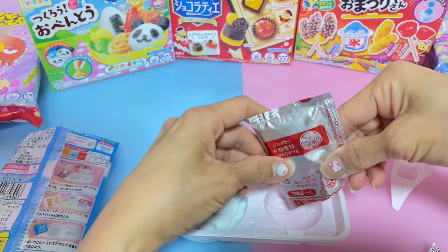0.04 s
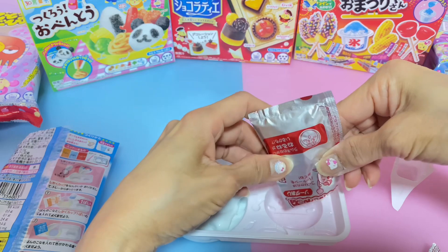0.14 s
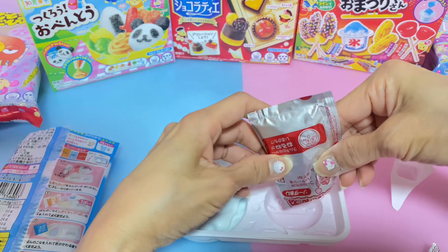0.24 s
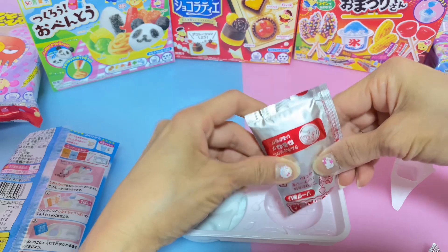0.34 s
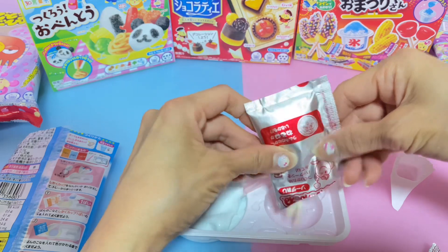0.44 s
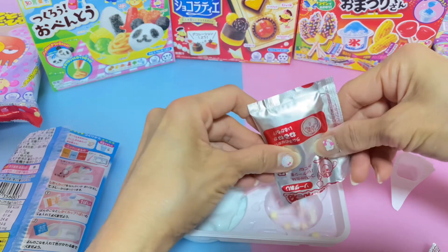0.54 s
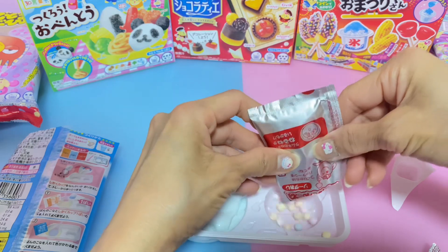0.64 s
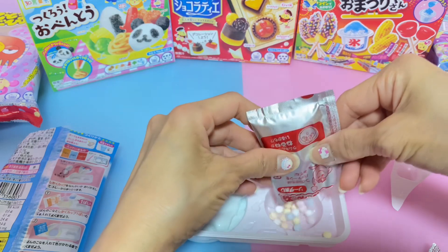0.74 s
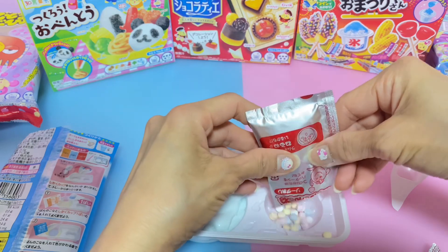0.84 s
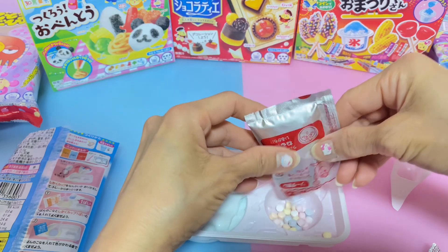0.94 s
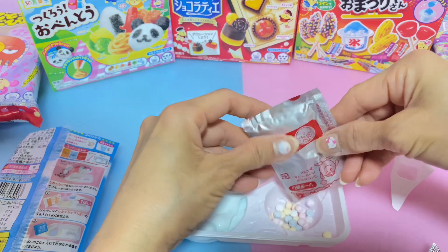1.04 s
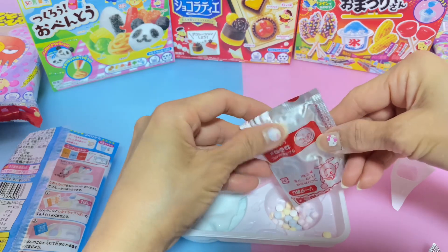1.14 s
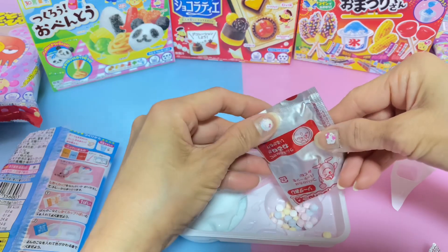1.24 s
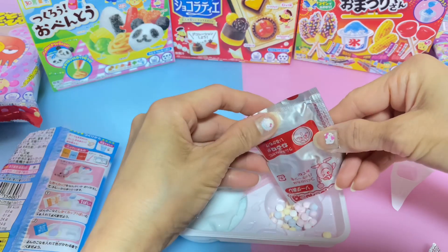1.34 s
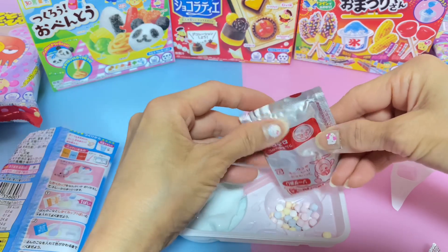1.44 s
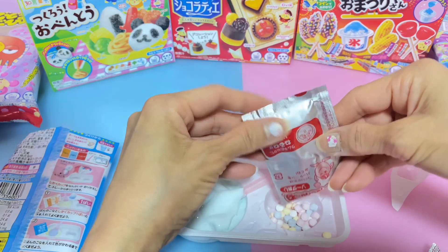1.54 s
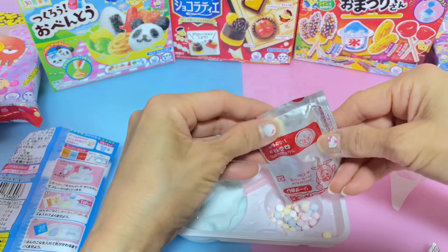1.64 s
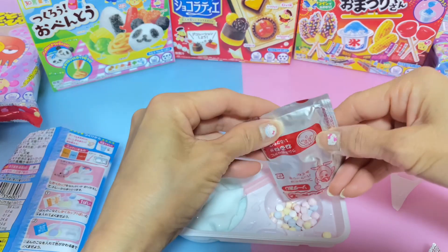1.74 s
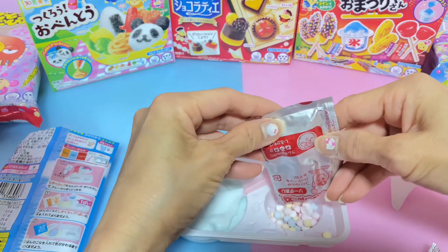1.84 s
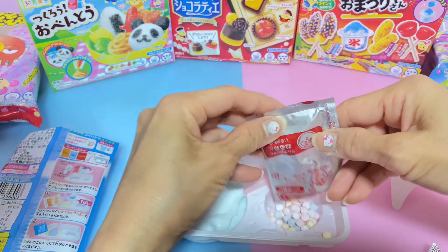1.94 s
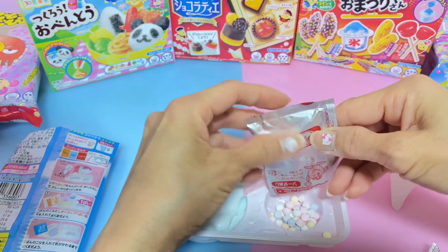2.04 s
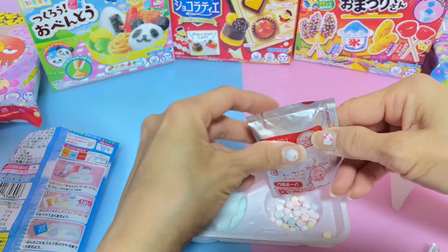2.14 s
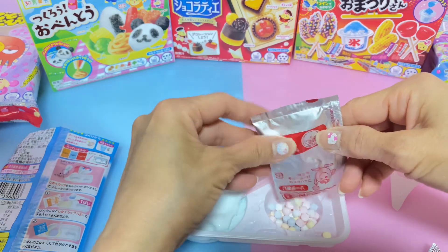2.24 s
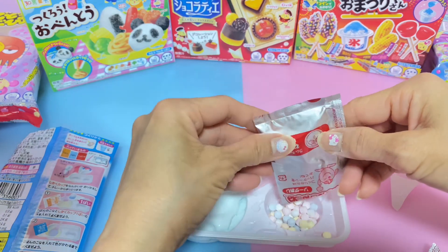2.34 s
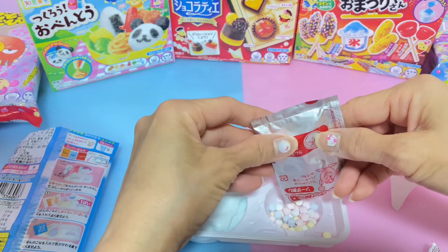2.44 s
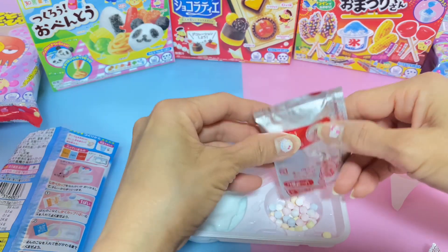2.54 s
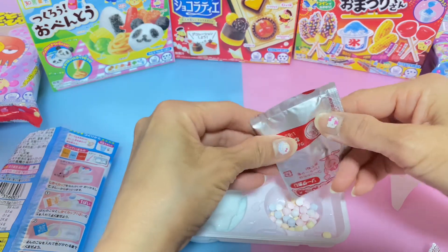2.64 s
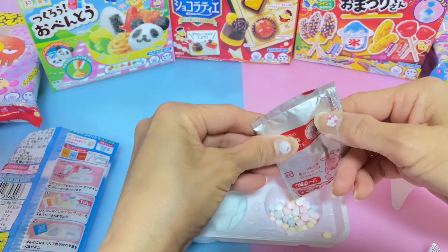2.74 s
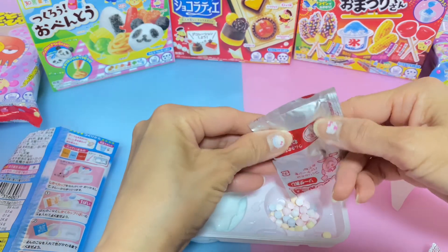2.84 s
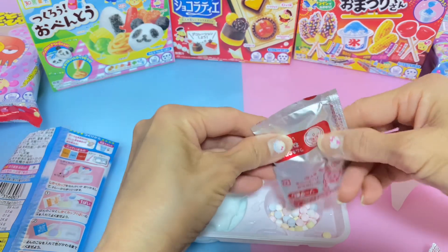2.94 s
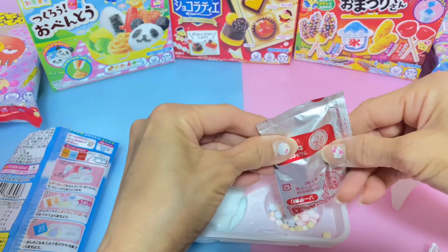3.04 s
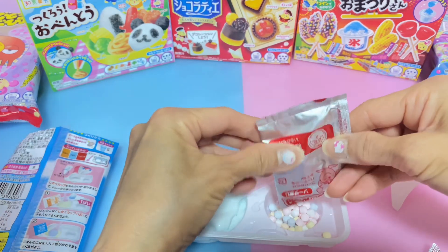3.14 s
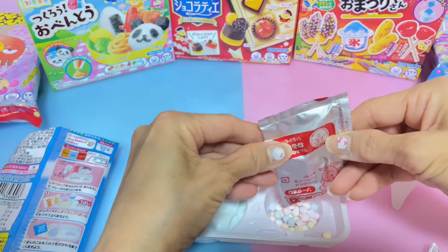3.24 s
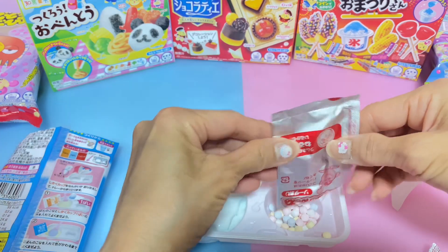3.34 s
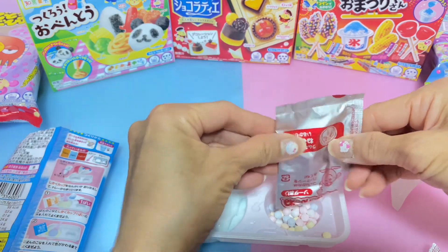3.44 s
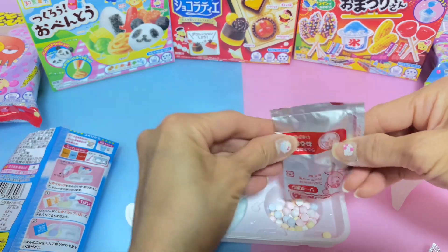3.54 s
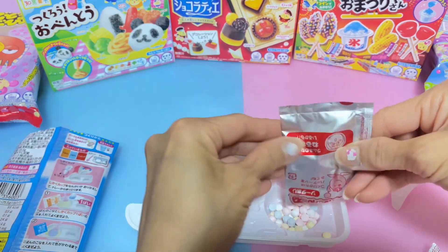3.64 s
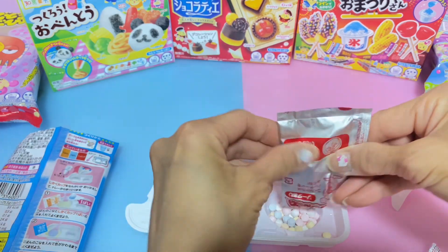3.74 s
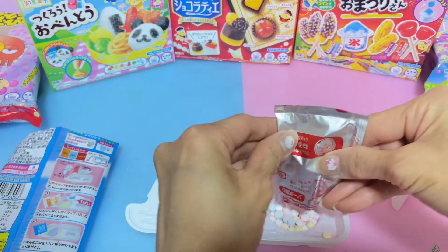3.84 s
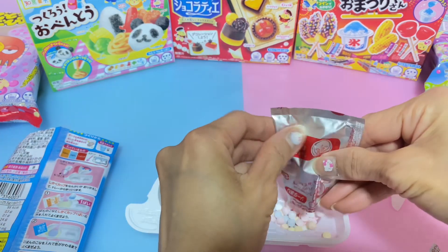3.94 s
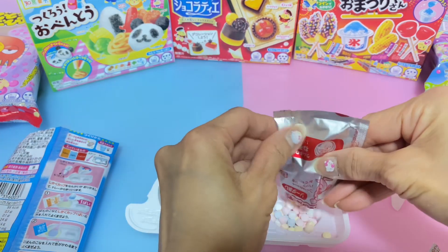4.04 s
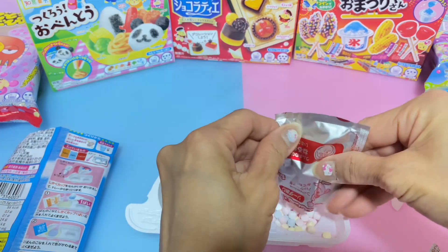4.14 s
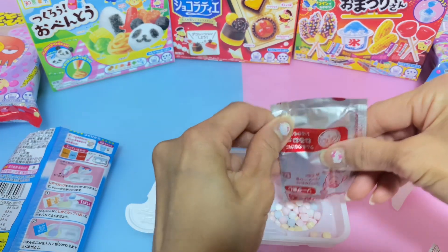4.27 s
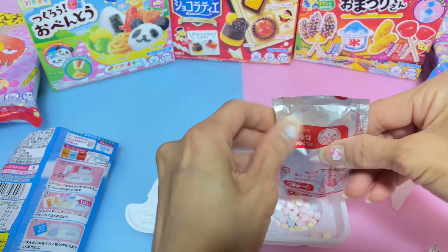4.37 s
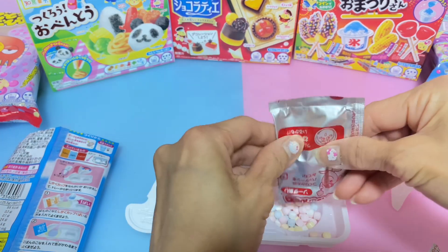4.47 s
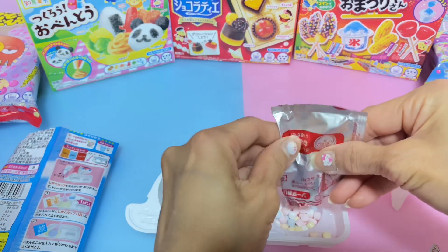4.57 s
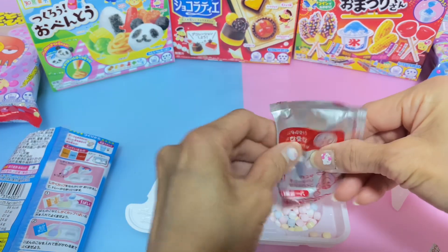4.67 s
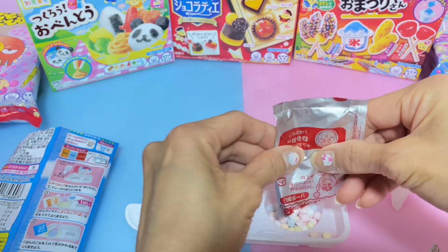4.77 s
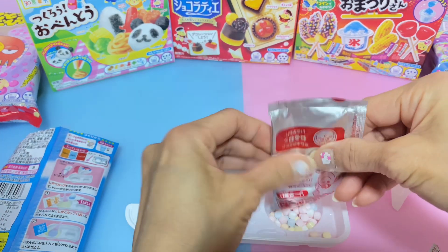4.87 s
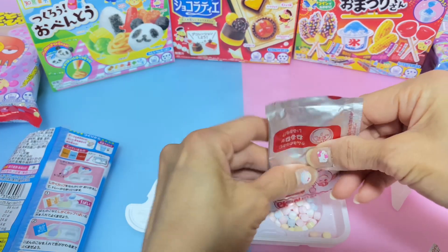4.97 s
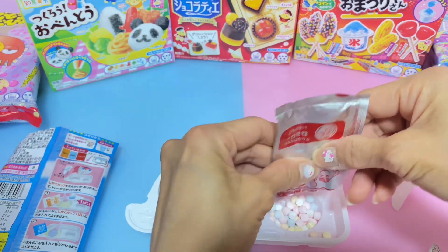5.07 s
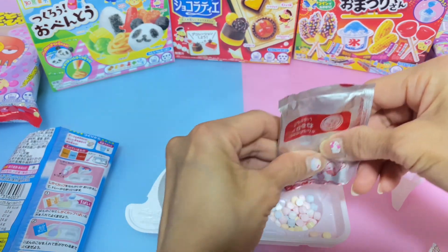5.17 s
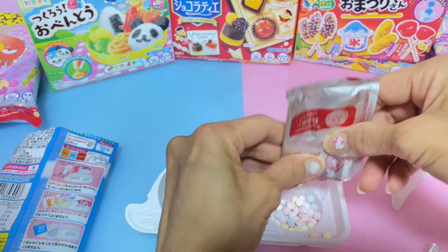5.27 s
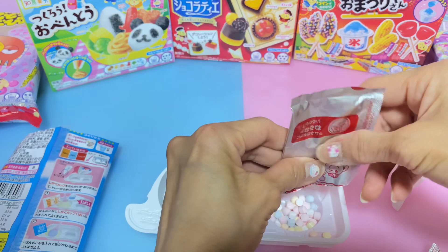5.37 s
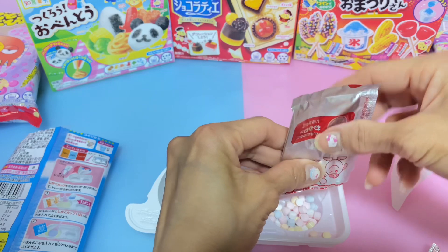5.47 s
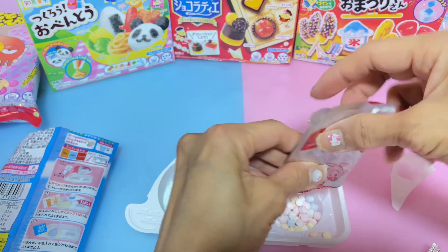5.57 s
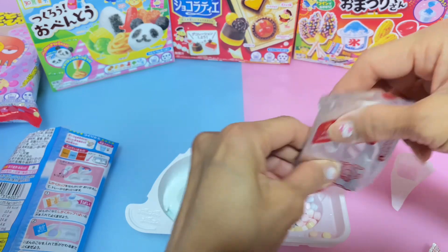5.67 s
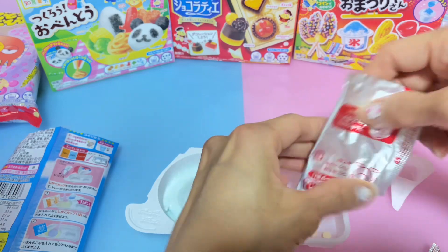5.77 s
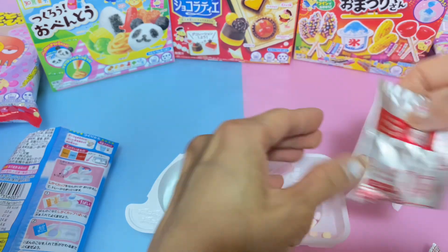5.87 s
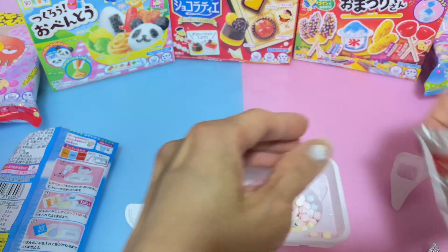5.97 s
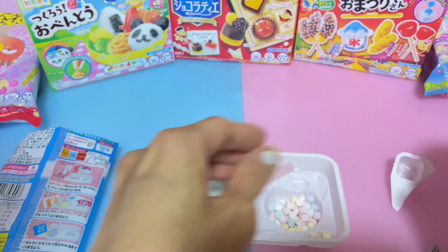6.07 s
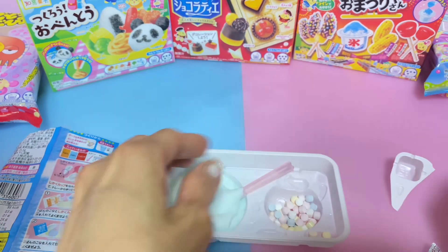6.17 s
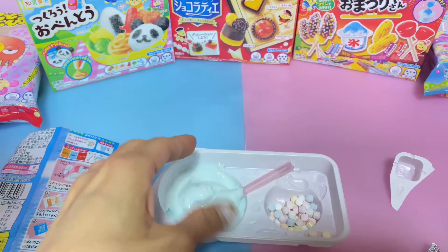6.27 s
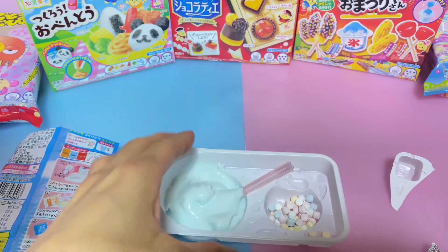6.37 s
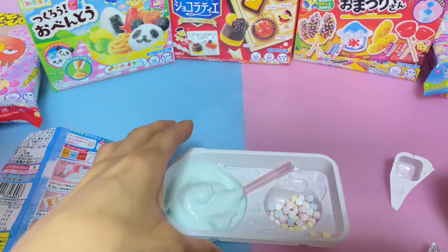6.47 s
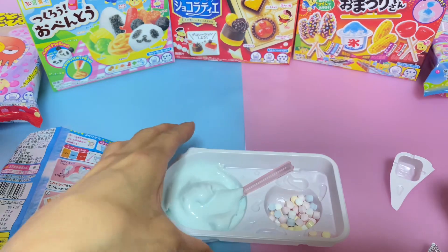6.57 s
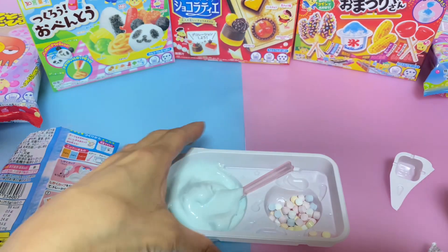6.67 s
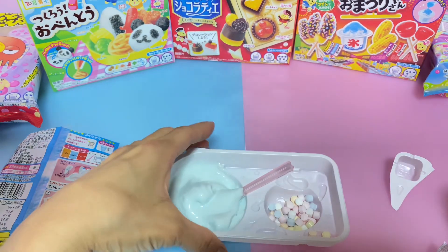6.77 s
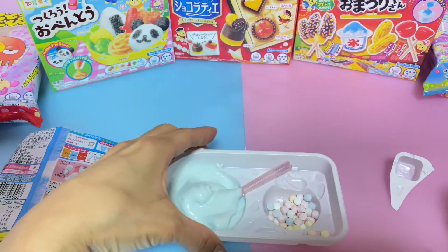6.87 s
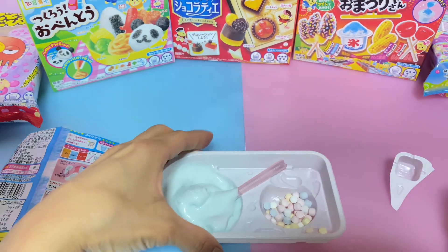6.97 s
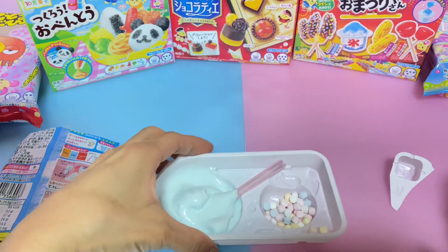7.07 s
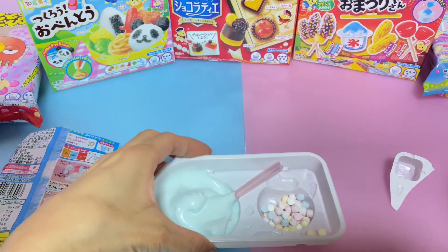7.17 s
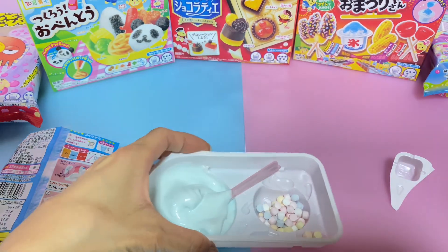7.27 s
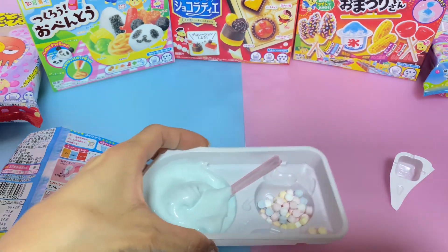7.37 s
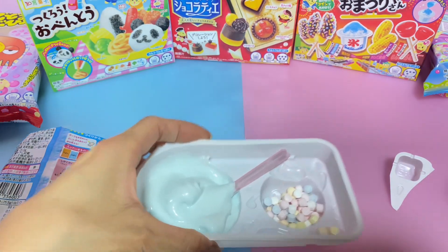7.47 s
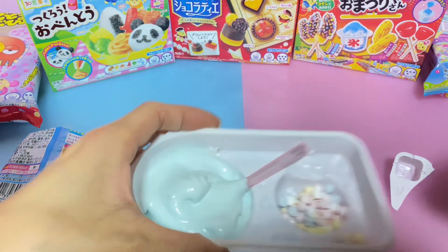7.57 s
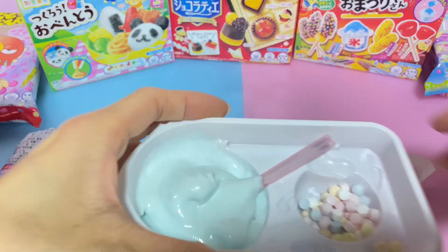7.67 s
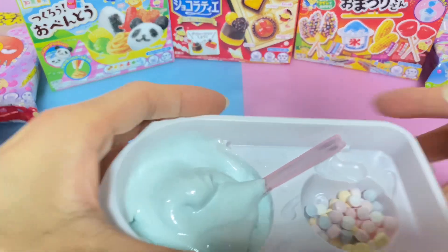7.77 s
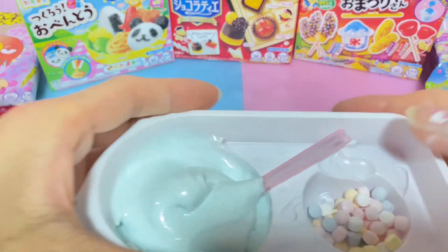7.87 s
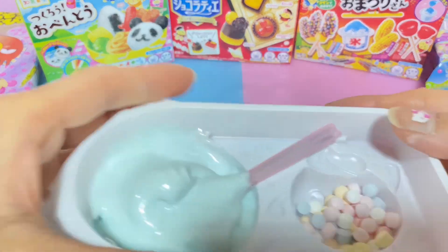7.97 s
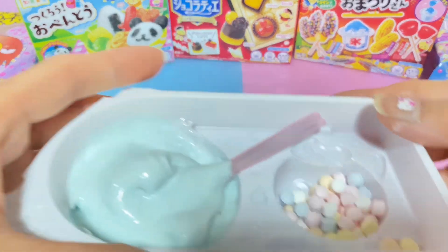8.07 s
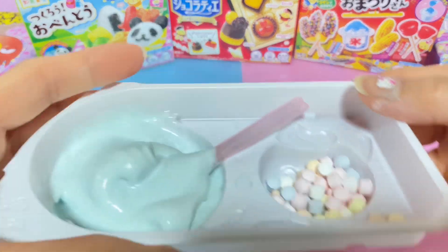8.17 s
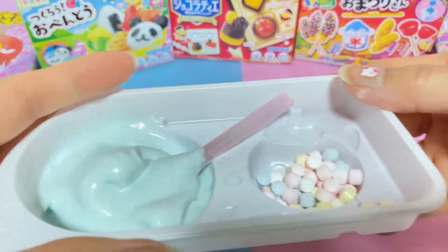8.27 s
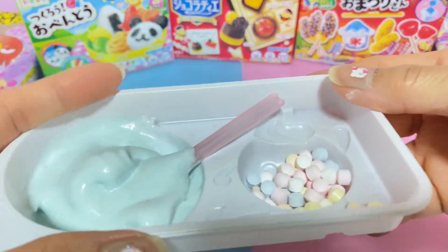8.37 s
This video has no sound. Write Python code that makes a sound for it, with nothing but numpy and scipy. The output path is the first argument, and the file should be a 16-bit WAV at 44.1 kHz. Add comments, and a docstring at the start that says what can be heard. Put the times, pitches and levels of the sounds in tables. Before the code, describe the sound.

A stiff foil packet is crinkled near a stereo microphone in a quiet indoor room. A loud cluster of snaps comes first, then steady crackling, then lighter irregular clicks with small renewed squeezes. The packet is put aside, and much softer skin scuffs, a barely audible squeak and little hollow ticks come from a thin plastic tray holding small sweets. Low room noise lies beneath.

```python
"""Foil sachet handled over a tray

Creases snap one by one as short noise bursts through resonant patches, over a rustle of dense random grains.
Later a hand slides on a plastic tray: rubbed noise, scuffs through wall resonances, ticks and a faint squeak.
The sachet wall groans as band-passed noise; low room noise swells and a diffuse tail follows the near sounds.
A two-port microphone hears all this with a likeness, lead and balance that depend on frequency."""
import sys
import numpy as np
from scipy import signal
from scipy.fft import rfft, irfft
from scipy.io import wavfile
from scipy.ndimage import uniform_filter1d

SR = 44100
rng = np.random.default_rng(int(sys.argv[2]) if len(sys.argv) > 2 else 0)


def master(y):
    """Save y as 16-bit WAV."""
    cut = np.clip(np.atleast_2d(y).T, -1, 1)
    pcm = np.round(cut * 32767)  # scale
    wavfile.write(sys.argv[1], SR, pcm.astype(np.int16))


N = 370881  # samples

# Spectrum of the low room noise: frequency_hz, relative_density_db
ROOM_SPECTRUM = [(15, -37.5), (25, -20), (64, -5), (92, -12), (123, -14.5), (180, -24), (384, -25.5),
                 (591, -36.5), (818, -32.5), (3080, -59), (16000, -64)]
# Decay of the diffuse tail: frequency_hz, t60_s
TAIL_DECAY = [(300, 0.23), (2000, 0.14), (14000, 0.042)]
# Phase by which the left port leads: frequency_hz, lead_rad
PORT_LEAD = [(0, -0.35), (7000, 0.5), (9000, -3.5), (11200, -6), (13400, -10), (16000, -11.5)]
# Likeness of the two ports: frequency_hz, likeness_0_to_1 (limited to MOST_ALIKE)
PORT_LIKENESS = [(60, 0.94), (300, 0.85), (1200, 0.5), (3000, 0.68), (5000, 0.62), (5900, 0.5), (7000, .9),
                 (15000, .88)]
# Balance, left over right: frequency_hz, balance_db
PORT_BALANCE = [(60, 1.5), (300, 3.5), (6000, 2.5), (8000, 0.2), (15000, 0)]
# Faint rubbing while the hand stays on the tray, one list per contact: time_s, level_db
RUB_LEVELS = [
    [(5.97, -53.5), (6.1, -65.5), (6.4, -59), (6.47, -70)],
    [(6.66, -73), (6.81, -63.5), (7.07, -58), (7.14, -66), (7.27, -57), (7.33, -77)],
    [(7.345, -55.5), (7.45, -68.5), (7.6, -74), (7.64, -60.5), (7.76, -84)],
    [(7.872, -53), (8.03, -58), (8.29, -54.5), (8.41, -64.5)],
]
# Spectrum of skin on plastic: frequency_hz, relative_density_db
SKIN_SPECTRUM = [(200, -24.5), (400, -9.5), (730, -0.5), (1250, -6.5), (2000, -4), (8000, -7),
                 (12000, -7.5), (15800, -9.5), (16200, -45)]
# Scuffs of skin along the tray: start_s, rise_s, fall_s, level_db, wall_pitch_hz
SCUFF_EVENTS = [(6.02, 0.031, 0.034, -53.5, 5500), (6.26, 0.0069, 0.019, -57, 900),
                (6.311, .02, 0.035, -55, 4300), (6.375, 0.026, 0.02, -55.5, 2800),
                (6.662, 0.012, 0.2, -48.5, 2600), (6.833, 0.014, 0.03, -45.5, 2720),
                (6.946, .005, .09, -55, 2500), (6.96, .055, .025, -56, 4300),
                (6.99, 0.032, 0.016, -54, 1500), (7.49, 0.024, 0.025, -58, 1194),
                (7.526, 0.034, 0.021, -58, 1200), (7.622, 0.012, 0.15, -52, 1150),
                (7.873, .006, .04, -58, 2100), (8.02, 0.076, 0.22, -56.5, 766),
                (7.96, 0.035, 0.078, -55, 1850), (8.058, 0.023, 0.028, -48, 3000),
                (8.18, 0.034, 0.038, -50.5, 2020)]
# Path of a slipping fingertip: time_s, level_db, pitch_hz
SQUEAK_PATH = [(5.951, -77, 2230), (6.03, -69, 2310), (6.17, -72, 2550)]
# Bends of the sachet wall: peak_s, level_db, rise_20db_s, fall_20db_s, pitch_hz
WALL_FLEXES = [(.4, -45, .04, .1, 290), (.5, -44, .12, .25, 370), (.8, -46, .2, .12, 850),
               (1.09, -46, .15, .12, 900), (1.48, -50, .05, .15, 480), (1.85, -46, .25, .15, 950),
               (2.01, -49, .03, .06, 400), (2.1, -49, .15, .12, 800), (3.8, -49, .04, .1, 380)]
# Squeezes of the sachet: firmest_grip_s, rustle_level_db, rise_20db_s, fall_20db_s
GRIP_SQUEEZES = [(0.0, -35, .05, .08), (.12, -62, .1, .05), (.38, -34, .11, .45), (.49, -24.5, .07, .44),
                 (.82, -34.5, .5, .085), (1.17, -33.5, .24, .14), (1.48, -45, .4, .5),
                 (1.69, -35.5, .1, .2), (1.849, -34, .2, .15), (2.14, -42, .6, .06), (2.25, -38, .07, .08),
                 (2.429, -49, .12, .035), (2.619, -50, .1, .12), (2.78, -62, .3, .3), (2.91, -49, .05, .25),
                 (3.3, -55, .06, .3), (3.5, -47, .12, .09), (3.69, -54, .07, .3), (3.918, -30, .2, .09),
                 (4.05, -46.5, .15, .14), (4.18, -56.5, .2, .4), (4.47, -51, .16, .25),
                 (4.85, -51, .11, .04), (4.98, -43.5, .06, .17), (5.3, -53, .3, .1), (5.45, -52, .06, .3),
                 (5.63, -49, .1, .045), (5.75, -60, .4, .4), (5.97, -47, .2, .06)]
# Broad spectrum of the foil: frequency_hz, relative_density_db
FOIL_SPECTRUM = [(150, -22), (330, -11.5), (1000, -7.5), (1700, -5.5), (2300, -3.5), (3400, -2),
                 (4500, -4.5), (6000, -6.5), (8000, -5), (11000, -7), (15500, -9.5), (16100, -33),
                 (17000, -45.5)]
# Sachet, tray and table ringing along: frequency_hz, width_hz, peak_db
HOLLOW_MODES = [(500, 200, -12.5), (727, 270, -10), (1340, 270, -2.5), (1880, 44, 1), (2200, 160, -4.5),
                (3458, 100, -12.5)]
# Ticks of the tray and the sweets in it: start_s, level_db, pitch_hz, thud_re_level_db, fizz_re_level_db, t60_s
TRAY_TICKS = [(6.19, -46.5, 3500, -16, -11, .0072), (6.209, -41, 4230, -11.5, -6, .011),
              (6.717, -43, 2770, -19, -22.5, .012), (6.761, -44, 4640, -10, -16, .022),
              (7.056, -45, 4800, -18, -10, .015), (7.341, -42.5, 5400, -8, -14, .0075),
              (7.359, -43, 6600, -13, -3, .032), (7.621, -42, 1204, -5, -12, .053),
              (7.877, -43.5, 3900, -23, -18, .03)]
# Creases of the foil snapping: start_s, level_db, patch_pitch_hz, thud_re_level_db, fizz_re_level_db
CREASE_SNAPS = [(.0446, -30, 3200, -35, -19), (.0764, -27, 2100, -19, -5), (.231, -34.5, 2050, -31, -12),
                (.2583, -30, 3120, -33, -14), (.3083, -39, 1260, -19, -16), (.3822, -21.5, 3040, -11, -11),
                (.3981, -35.5, 2200, -3, -13), (.4496, -19, 2800, -17, -26), (.4568, -16.5, 2870, -17, -6),
                (.4903, -19, 3320, -23, -3), (.522, -22, 1974, -17, -9), (.56, -13.5, 3170, -27, -10),
                (.578, -27, 2300, -15, -10), (.5965, -23, 2660, -13, -8), (.6131, -22.5, 3580, -25, -7),
                (.632, -30, 2010, -15, -9), (.6999, -26, 3500, -15, -4), (.7256, -19, 3300, -27, -10),
                (.752, -23.5, 3460, -19, -17), (.852, -29.5, 2700, -12, -16), (.9407, -26, 2960, -11, -7),
                (.9997, -21, 2350, -11, -11), (1.0124, -28, 1500, -9, -17), (1.1121, -29, 5330, -9, -12),
                (1.1308, -28.5, 2070, -20, -14), (1.1689, -22, 2230, -24, -12),
                (1.2008, -35, 2210, -14, -12), (1.2786, -34.5, 3260, -12, -8),
                (1.3155, -33, 2300, -14, -12), (1.3202, -24.5, 2320, -17, -17),
                (1.3802, -29.5, 3370, -14, -10), (1.4152, -33, 2250, -18, -21), (1.5251, -41, 1530, 4, -25),
                (1.5915, -35.5, 1300, -10, -15), (1.5986, -24, 2250, -10, -12),
                (1.6085, -29, 1180, -8, -27), (1.6572, -33, 2210, -14, -12), (1.694, -33, 2880, -14, -12),
                (1.7037, -24.5, 2290, -26, -14), (1.7732, -22, 2200, -12, -7),
                (1.8059, -30, 3460, -14, -12), (1.8368, -29, 2170, -14, -12),
                (1.8592, -28.5, 2200, -18, -28), (1.89, -30.5, 5400, -13, -13),
                (1.9671, -24.5, 3440, -16, -9), (2.0288, -30.5, 2180, -8, -8),
                (2.1493, -29.5, 2300, -7, -11), (2.1958, -32, 2100, -17, -5), (2.2223, -26, 2820, -19, -10),
                (2.2564, -34, 2540, -14, -12), (2.266, -31.5, 1500, -12, -18),
                (2.3012, -37, 1860, -10, -15), (2.358, -40, 1420, -4, -11), (2.4304, -44, 2100, -6, -20),
                (2.5312, -41, 3600, -14, -12), (2.5583, -42, 2800, 3, -30), (2.6211, -38, 2200, -14, -30),
                (2.628, -39, 2800, -12, -25), (2.7989, -27, 2370, -36, -38), (2.8204, -34.5, 2020, -5, -19),
                (2.8712, -34, 2060, -13, -22), (2.893, -28.5, 2100, -31, -13),
                (2.913, -38.5, 2010, -14, -20), (2.9343, -36, 2050, -10, -14),
                (3.0306, -39.5, 2030, -6, -9), (3.0498, -33.5, 2280, -37, -7),
                (3.1058, -41.5, 1230, -3, -12), (3.1599, -36, 3470, -10, -8),
                (3.2264, -39.5, 2780, -16, -8), (3.2702, -39.5, 1350, -12, -4),
                (3.2814, -39.5, 3660, -10, -11), (3.3332, -36, 3400, -17, -13),
                (3.4546, -38, 3420, -12, -14), (3.4922, -29.5, 2270, -12, -7), (3.5027, -27, 3750, -12, -8),
                (3.6652, -44.5, 2270, -8, -40), (3.69, -35, 3740, -6, -24), (3.7245, -36, 3660, -12, -14),
                (3.7444, -34, 1210, -2, -18), (3.7924, -36, 2080, -5, -14), (3.812, -36.5, 2130, -2, -1),
                (3.824, -35, 4000, -15, -3), (3.8364, -29, 2330, -9, -2), (3.8761, -28, 3960, -24, -15),
                (3.896, -31, 2300, -15, -12), (3.909, -30, 3300, -18, -12), (3.9202, -23, 2380, -41, -33),
                (3.9422, -32.5, 3980, -41, -36), (3.972, -37, 1850, -15, -14),
                (4.0338, -29.5, 1960, -18, -16), (4.198, -32, 3500, -19, -20),
                (4.2015, -21, 3800, -19, -20), (4.2399, -36, 3320, -20, -13), (4.3122, -42, 3500, -12, -10),
                (4.3429, -33, 3670, -21, -14), (4.3988, -37, 2840, -23, -17),
                (4.4096, -42.5, 4630, -5, -16), (4.4505, -33, 3520, -18, -25), (4.464, -40, 4300, -25, -14),
                (4.4693, -39, 3670, -21, 1), (4.4859, -37.5, 3620, -10, -16), (4.525, -34, 2430, 0, -14),
                (4.564, -44, 1350, -13, -16), (4.6131, -43, 7490, -31, -2), (4.6638, -27, 3700, -15, -9),
                (4.6765, -41, 1250, 3, -20), (4.6812, -29.5, 4340, -8, -7), (4.7101, -43, 1340, 0, -15),
                (4.7244, -43.5, 4870, -12, -16), (4.7701, -46, 1940, -4, -25), (4.8295, -47, 2000, -5, -20),
                (4.8542, -36.5, 2000, -9, -12), (4.9485, -47, 1920, -10, -10), (4.9645, -31, 2000, -12, -7),
                (4.9713, -22, 5900, -14, -14), (5.0064, -31, 5430, -21, -9), (5.05, -39, 2100, -20, -12),
                (5.0596, -33.5, 2070, -27, -12), (5.0748, -31, 3000, -8, 4), (5.157, -42.5, 4200, -26, -19),
                (5.192, -29, 7100, -13, -1), (5.1998, -38, 1340, -4, -8), (5.216, -43, 1900, -8, -14),
                (5.2549, -32, 2200, -11, -9), (5.2818, -29, 1980, -21, -6), (5.487, -43, 2500, -12, -8),
                (5.5075, -38, 1960, -8, -1), (5.6171, -35.5, 2840, -8, -3), (5.697, -32.5, 1900, -21, -7),
                (5.7434, -37.5, 1380, -14, -11), (5.8331, -32.5, 4930, -14, -27),
                (5.897, -43, 3530, -17, -22), (5.929, -41, 2400, -15, -10), (5.9347, -36, 2000, -18, -8)]

EDGE_HZ, MOST_ALIKE = 17000, .96
RUMBLE_DB, SWELL_RISE_S = -61.5, .15  # the rise covers 20 dB
SWELLS = [(2.64, -49, 1.0), (3.42, -49, .8)]  # peak_s, level_db, fall_20db_s
STIR_DB, STIR_T60_S = -24, .13  # each snap leaves the foil crackling: dB re its level, dying away
THUD_HZ, MIDDLE_HZ, FIZZ_HZ = (300, 1200), (1200, 8000), (9500, 12500)
SNAP_T60_S, TIGHT_DB, LONGER_PER_DB = .03, -35, .04  # a snap rings longer in a firmer grip
THUD_LAG_S = .0024  # the bass of a snap follows its crack
SNAP_SAMPLES, LEAD_IN_S = 2560, .012  # length of one burst, and the part before its crack


def amp(db):
    """Decibel law: level in dB to amplitude ratio."""
    return 10 ** (np.asarray(db) / 20)


def evened(x):
    """Normalization: each row is brought to unit rms."""
    return x / np.sqrt(np.mean(x ** 2, -1, keepdims=True) + 1e-20)


def read(points, hz):
    """Interpolation of a curve along log frequency."""
    f, value = np.transpose(points)
    return np.interp(np.log(hz + 1), np.log(f + 1), value)


def shaped(x, gain):
    """Linear filtering: the spectrum of each row is multiplied by gain(hz)."""
    length = x.shape[-1]
    return irfft(rfft(x) * gain(np.fft.rfftfreq(length, 1 / SR)), length)


def tents(t, peak_s, db, rise, fall):
    """Power summation, in dB, of bumps that climb and decay exponentially."""
    late = np.asarray(t)[..., None] - peak_s
    bumps = amp(db - 20 * np.maximum(late / fall, -late / rise))
    return 10 * np.log10((bumps ** 2).sum(-1) + 1e-14)


def ports(pair):
    """Interaural-style coherence: two noise versions are mixed by likeness, shifted in phase and balanced."""
    hz = np.fft.rfftfreq(pair.shape[-1], 1 / SR)
    same = np.clip(read(PORT_LIKENESS, hz), 0, MOST_ALIKE)
    a, b = rfft(pair)
    mixed = same * a + np.sqrt(1 - same ** 2) * b
    right = mixed * np.exp(-1j * np.interp(hz, *np.transpose(PORT_LEAD)))
    side = amp(read(PORT_BALANCE, hz) / 2)
    return irfft(np.array([a * side, right / side]), pair.shape[-1])


def hollow(hz):
    """Sympathetic resonance: peaks of the sachet, tray and table ringing along."""
    return 1 + sum(amp(db) / (1 + 2j * (hz - f) / w) for f, w, db in HOLLOW_MODES)


def body(hz):
    """Source and resonator: the foil's broad colour times the peaks of what rings along."""
    return amp(read(FOIL_SPECTRUM, hz)) * hollow(hz)


def tilt(hz, thud, fizz, knee_hz):
    """Spectral balance: scales the bass and slopes the treble from the knee upward."""
    low = 1 / (1 + (hz / 1150) ** 6)
    slope = np.log((hz + 1) / knee_hz) / np.log(9500 / knee_hz)
    return (low * thud + 1 - low) * fizz ** np.clip(slope, 0, 1)


def rumble():
    """Stationary room noise: coloured noise whose part below about 170 Hz swells a little."""
    noise = evened(shaped(rng.standard_normal((2, N)), lambda hz: amp(read(ROOM_SPECTRUM, hz))))
    low = shaped(noise, lambda hz: 1 / (1 + (hz / 170) ** 4))
    peak_s, db, fall = np.transpose(SWELLS)
    swells = amp(tents(np.arange(N) / SR, peak_s, db, SWELL_RISE_S, fall))
    level = np.hypot(amp(RUMBLE_DB), swells)
    return ports(low * level + (noise - low) * amp(-52.5))


def room(x):
    """Diffuse reverberation: convolution with noise whose bands each die at their own speed."""
    hz, t, z = signal.stft(rng.standard_normal((2, SR // 4)), SR, nperseg=128)
    decay = amp(-60 * t / read(TAIL_DECAY, hz)[:, None])
    tail = signal.istft(z * decay, SR, nperseg=128)[1]
    tail[:, :130] = 0  # the first reflection needs 3 ms
    tail = ports(tail)
    feed = x.mean(0)[None] + x[:1]
    return signal.fftconvolve(feed, tail / np.linalg.norm(tail[0]) / 2, axes=1)[:, :N]


def strokes(sing_db=19, width=0.1, rough=0.3):
    """Frictional excitation: skin stutters along plastic as rough hiss; in each scuff one tray wall sings."""
    t = np.arange(N) / SR
    a, b, slips = rng.standard_normal((3, N))
    stutter = np.exp(rough * evened(uniform_filter1d(slips, 50)))
    rub = np.array([a, b]) * stutter
    rub = evened(shaped(rub, lambda hz: amp(read(SKIN_SPECTRUM, hz)) * hollow(hz) ** .4))
    out = rub * sum(amp(np.interp(t, *np.transpose(rows), left=-140, right=-140)) for rows in RUB_LEVELS)
    for s, rise, fall, db, pitch in SCUFF_EVENTS:
        at = slice(round(s * SR), round((s + rise + 2 * fall) * SR))
        wall = shaped(rub[:, at], lambda hz: 1 + amp(sing_db) / (1 + 2j * (hz - pitch) / (width * pitch)))
        corners_s = [0, rise, rise + fall, rise + 2 * fall]
        swell_db = np.interp(t[at] - s, corners_s, [-12.5, 2, -34, -59])
        out[:, at] += evened(wall) * amp(db + swell_db)
    return out


def squeak():
    """Frequency modulation: a slipping fingertip gives a thin sine glide made fuzzy by random pitch jitter."""
    s, db, hz = np.transpose(SQUEAK_PATH)
    t = np.arange(N) / SR
    jitter_hz = 40 * evened(uniform_filter1d(rng.standard_normal(N), 200))
    turns = np.cumsum(np.interp(t, s, hz) + jitter_hz) / SR
    sounding = (t > s[0]) * (t < s[-1])
    return np.sin(2 * np.pi * turns) * amp(np.interp(t, s, db)) * sounding


def flexes():
    """Resonant band-pass: the sachet wall bends in the fingers with a dull, lumpy groan."""
    t = np.arange(N) / SR
    a, b, lumps = rng.standard_normal((3, N))
    noise = np.array([a, b]) * np.exp(.45 * evened(uniform_filter1d(lumps, 350)))
    out = np.zeros((2, N))
    for s, db, rise, fall, pitch in WALL_FLEXES:
        at = slice(round((s - 2 * rise) * SR), round((s + 2 * fall) * SR))
        groan = shaped(noise[:, at], lambda hz: 1 / (1 + (1.1 * (hz / pitch - pitch / (hz + 1))) ** 2))
        out[:, at] += evened(groan) * amp(tents(t[at], s, db, rise, np.array([fall])))
    return out


def handling():
    """Power addition: rustle level in dB from the squeezes and the stir after every snap."""
    t = np.arange(0, N / SR + .01, .002)
    s, db = np.transpose(CREASE_SNAPS)[:2]
    stir = tents(t, s, db + STIR_DB, .008, STIR_T60_S / 3)  # a third of t60 is a fall of 20 dB
    squeeze = tents(t, *np.transpose(GRIP_SQUEEZES))
    both = 10 * np.log10(amp(stir) ** 2 + amp(squeeze) ** 2)
    return np.interp(np.arange(N) / SR, t, both)


def rustle(per_s=1000, spread_db=3.8, t60=0.014, rub_db=-13, thud_db=1.5, fizz_db=4, patch_db=17):
    """Granular shot noise: small creases in clumps, 18 colours of grain, over foil sliding on foil."""
    clumps = np.exp(0.65 * evened(uniform_filter1d(rng.standard_normal(N), 700)))
    size = amp(spread_db * np.minimum(rng.exponential(1, N), 4))
    size = size * (rng.random(N) < clumps * per_s / SR)
    kind = rng.integers(0, 18, N)
    grain_t = np.arange(1024) / SR
    fall = amp(-60 * grain_t / t60) * np.minimum(grain_t / .0007, 1)
    pitch = np.geomspace(600, 4300, 18)[:, None, None]

    def patch(hz):
        return 1 + amp(patch_db) / (1 + 2j * (hz - pitch) / (.27 * pitch))

    shapes = shaped(rng.standard_normal((18, 2, 1024)) * fall, patch)
    grains = sum(signal.oaconvolve((size * (kind == k))[None], shapes[k], axes=1)[:, :N] for k in range(18))
    foil = evened(grains) + amp(rub_db) * rng.standard_normal((2, N))
    foil = evened(shaped(foil, lambda hz: body(hz) * tilt(hz, amp(thud_db), amp(fizz_db), 4000)))
    return foil * amp(handling())


def creases():
    """Damping under tension: snap rows gain a ring time that grows with the grip."""
    grip_db = np.maximum(tents(np.transpose(CREASE_SNAPS)[0], *np.transpose(GRIP_SQUEEZES)), -60)
    t60 = SNAP_T60_S * np.exp(LONGER_PER_DB * (grip_db - TIGHT_DB))
    return np.column_stack([CREASE_SNAPS, t60])


def loudness(burst, band_hz):
    """Band level: rms of one band of each burst over the 4 ms after its crack."""
    band = shaped(burst, lambda hz: (hz > band_hz[0]) & (hz < band_hz[1]))[..., 525:705]
    return np.sqrt((band ** 2).mean((0, -1))[:, None])


def snaps(rows, ring_db, rattle_db, sharp, beside_db):
    """Impulsive excitation of patches: a burst, with a short noise swell before and a lumpy rattle after."""
    s, db, pitch, thud_db, fizz_db, t60 = np.transpose(rows)[:, :, None]
    t = np.arange(SNAP_SAMPLES) / SR - LEAD_IN_S
    after = np.maximum(t, 0)
    a, b, lumps = rng.standard_normal((len(rows), 3, SNAP_SAMPLES)).swapaxes(0, 1)
    # single draws from the lump noise also vary each event
    pocket_hz = 500 * np.exp(0.3 * lumps[:, :1])  # the air pocket that each fold squeezes
    # neighbouring patches that ring too
    others_hz = np.sqrt(2600 * pitch) * np.exp(.55 * lumps[:, 1:4].T[:, :, None])
    rise_s = .0013 * np.exp(.6 * lumps[:, 4:5])  # some creases give way at once, others tear a little
    lumps = np.exp(.9 * evened(uniform_filter1d(lumps, 70)))
    decay = amp(-60 * after / t60) + amp(0.5 - 60 * after / .009)
    crack = decay * np.clip(t / rise_s + .4, 0, 1)
    around = amp(rattle_db - 60 * np.maximum(t / 0.037, .08 - t / 0.022)) * lumps  # lead-in noise and rattle

    def patch(hz):
        ring = amp(ring_db) / (1 + 1j * sharp * (hz - pitch) / pitch)
        return 1 + ring + sum(amp(beside_db) / (1 + 1j * sharp * (hz - f) / f) for f in others_hz)

    def pocket(hz):
        return 1 + amp(5.5) / (1 + 2j * (hz - pocket_hz) / 190)

    noise = np.array([a, b])
    burst = shaped(noise * crack, patch) + noise * around
    burst = shaped(burst, lambda hz: body(hz) * pocket(hz))
    middle = loudness(burst, MIDDLE_HZ)
    thud = amp(thud_db) * middle / loudness(burst, THUD_HZ)
    fizz = amp(fizz_db) * middle / loudness(burst, FIZZ_HZ)
    burst = shaped(burst, lambda hz: tilt(hz, thud, fizz, np.maximum(4000, 1.2 * pitch)))
    burst *= amp(db) / loudness(burst, MIDDLE_HZ)
    # the delay is longest in the bass and shrinks above 800 Hz
    burst = shaped(burst, lambda hz: np.exp(-2j * np.pi * THUD_LAG_S * 800 * np.arctan(hz / 800)))
    out = np.zeros((2, N + 2 * SNAP_SAMPLES))  # room for bursts that cross either end
    starts = np.round((s[:, 0] + t[0]) * SR).astype(int) + SNAP_SAMPLES
    for k, at in enumerate(starts):
        out[:, at:at + SNAP_SAMPLES] += burst[:, k]
    return out[:, SNAP_SAMPLES:N + SNAP_SAMPLES]


def scene():
    """Superposition: near sources at the two ports, their diffuse tail and the room noise."""
    foil_snaps = snaps(creases(), 10.0, -17, 8.5, 5.5)
    tray_ticks = snaps(TRAY_TICKS, 16.0, -18, 8.0, 3.0)
    near = ports(foil_snaps + tray_ticks + rustle() + flexes() + strokes() + squeak())
    return near + amp(-14) * room(near) + rumble()


def record(dry):
    """Band limiting: a linear-phase low-pass at EDGE_HZ."""
    lowpass = signal.firwin(511, EDGE_HZ, window=("kaiser", 9), fs=SR)
    return signal.oaconvolve(dry, lowpass[None], "same")


dry = scene()
out = record(dry)
master(out)
```